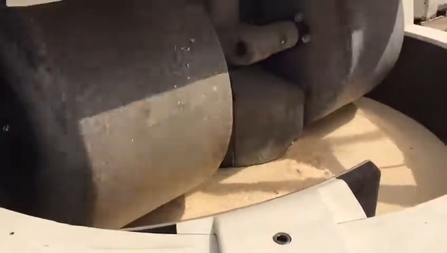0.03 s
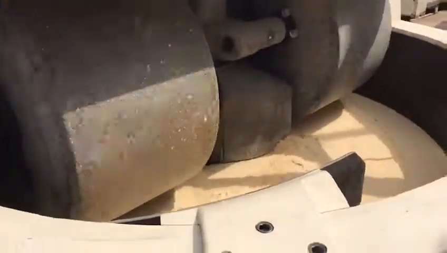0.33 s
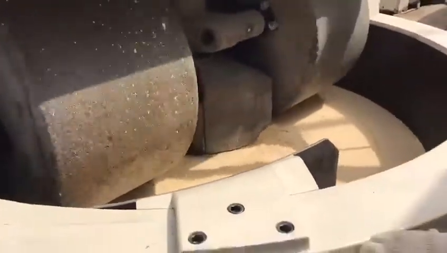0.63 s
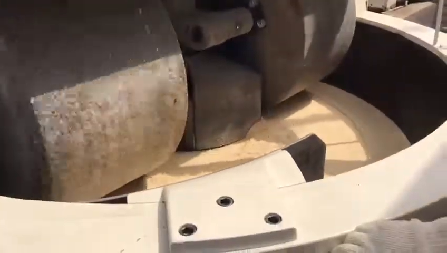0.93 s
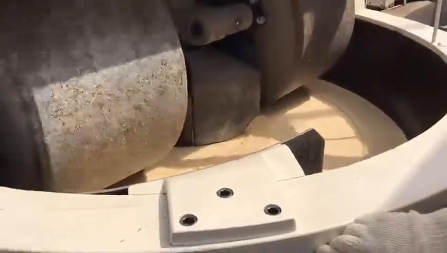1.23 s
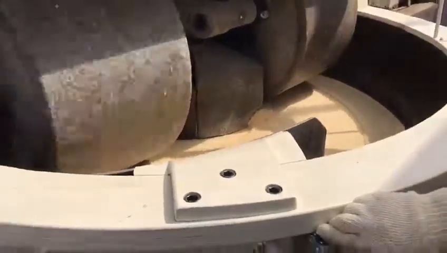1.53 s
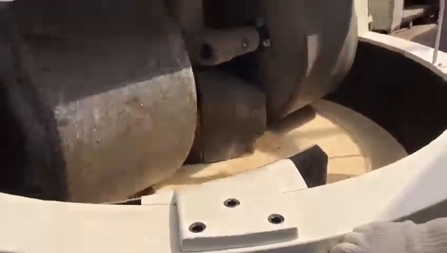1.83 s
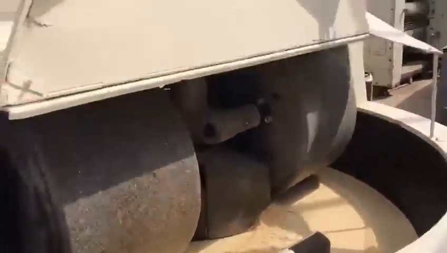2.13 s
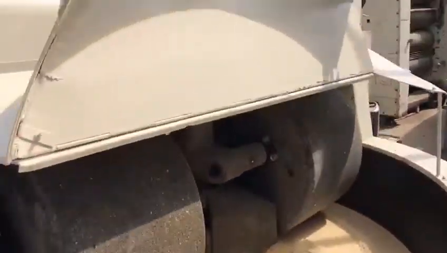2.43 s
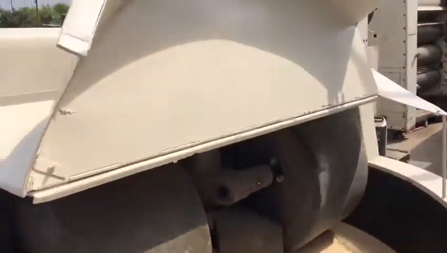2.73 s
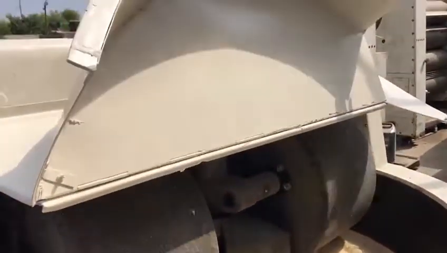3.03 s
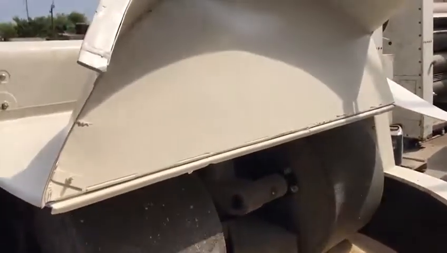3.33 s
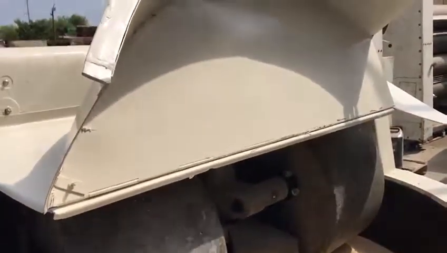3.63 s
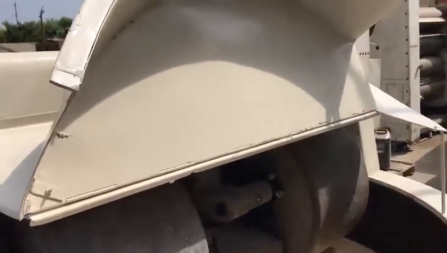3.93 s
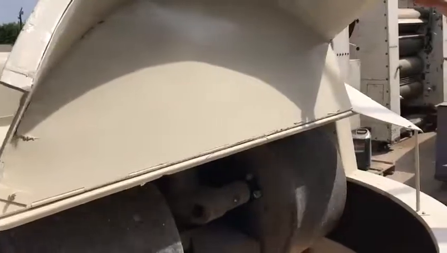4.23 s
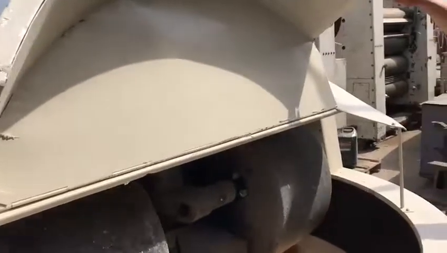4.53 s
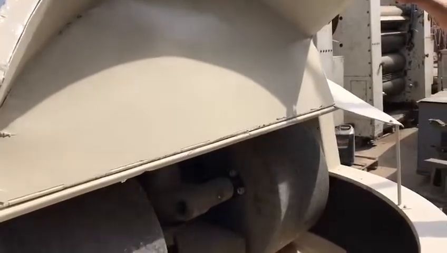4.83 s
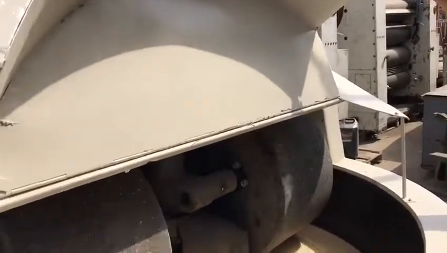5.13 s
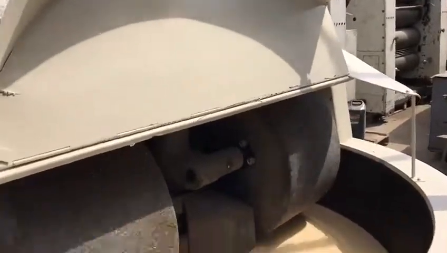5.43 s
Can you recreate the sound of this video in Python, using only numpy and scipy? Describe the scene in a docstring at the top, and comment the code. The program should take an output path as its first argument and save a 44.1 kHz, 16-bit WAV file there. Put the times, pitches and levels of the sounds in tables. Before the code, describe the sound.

Heavy steel rollers grind material in a running mill: a throbbing low rumble with surges of crunching, hissing grit and occasional knocks.

```python
"""Roller mill in open air

A large mill is heard from the rim of its open pan. Forced vibration makes the frame throb and the
drive drone, swelling each time a roller takes load. Impacts of the rollers on the bed rumble and
knock through the resonances of the steel housing and the hood. Each pass, and each lump of feed
caught under a roller, crunches and bursts by brittle fracture into hissing grit, with a few cracks."""
import sys
import numpy as np
from scipy import signal
from scipy.fft import rfft, irfft
from scipy.io import wavfile

SR = 44100
rng = np.random.default_rng(int(sys.argv[2]) if len(sys.argv) > 2 else 0)


def master_out(mix):
    """Clip the mix to full scale and print it as 16-bit PCM to the path in sys.argv[1]."""
    frames = np.transpose(np.atleast_2d(mix))
    ceiling = np.clip(frames, -1, 1)
    pcm = np.round(ceiling * 32767).astype(np.int16)
    wavfile.write(sys.argv[1], SR, pcm)


N = 246959
SHAFT_HZ = 10.422


# A roller rides onto the bed about every 3/4 s: peak_load_s, half_width_s, boom_db, grit_db
ROLLER_PASSES = [(0.02, 0.15, -14, -37.5), (0.71, 0.16, -15, -60), (1.48, 0.18, -10, -34.5),
                 (2.19, 0.17, -15, -56.5), (3.03, 0.2, -13, -41), (3.73, 0.2, -14, -43),
                 (4.595, 0.12, -10.5, -35.5), (5.31, 0.22, -13.5, -38)]
# Weaker shaft harmonics; multiples of five are the gear mesh: order, level_db
SHAFT_HARMONICS = [(5, -42), (7, -37.5), (9, -36), (10, -29), (14, -31), (17, -34), (20, -33.5), (25, -33),
                   (45, -41.5)]

def drive(boom_order=15, boom_gain_db=-1.0, idle_db=-23.5):
    """Resonance: one shaft harmonic booms in the pan under load. Returns drone and pan vibration."""
    phase = 2 * np.pi * SHAFT_HZ * np.arange(N) / SR
    passes = power_sum(undb(db) * swell(s, width) for s, width, db, _ in ROLLER_PASSES)
    load = power_sum([undb(idle_db), passes])
    pan = vibration(boom_order * phase, flutter_db=1.45, wobble_rad=0.89)
    harmonics = sum(undb(db) * vibration(order * phase, flutter_db=2.5, wobble_rad=0.43)
                    for order, db in SHAFT_HARMONICS)
    return undb(boom_gain_db) * load * pan + harmonics, pan


# Envelope of the frame's vibration: time_s, level_db
FRAME_ENVELOPE = [(0.0, -40), (0.09, -26), (0.28, -29), (0.89, -17.5), (1.4, -26), (2.21, -28.5),
                  (2.63, -20), (2.93, -28), (3.02, -22), (3.77, -27), (3.84, -33), (4.52, -19.5),
                  (4.83, -39), (5.01, -20.5), (5.49, -27), (5.6, -25)]

def frame(order=6, gain_db=-0.5):
    """Forced vibration: the heavy frame throbs at a low harmonic of the shaft."""
    phase = 2 * np.pi * order * SHAFT_HZ * np.arange(N) / SR
    return undb(curve(FRAME_ENVELOPE) + gain_db) * vibration(phase, flutter_db=2.2, wobble_rad=0.45)


# Envelope of the rolling: time_s, level_db
ROLLING_ENVELOPE = [(0, -20.5), (.28, -23), (.68, -20), (.9, -20.5), (1.03, -21.5), (1.1, -21),
                    (1.22, -18.5), (1.4, -20.5), (1.52, -19), (1.78, -22.5), (2.1, -21), (2.3, -20),
                    (2.4, -22), (3.25, -21), (3.42, -23.5), (3.64, -20.5), (3.92, -24), (4.13, -21.5),
                    (4.38, -22), (4.55, -20.5), (4.85, -24), (5.0, -20), (5.12, -21.5), (5.3, -20.5),
                    (5.47, -22), (5.6, -18)]
# Broad spectrum of the rolling: frequency_hz, gain_db
RUMBLE_SPECTRUM = [(22, -44), (42, -21.5), (72, -2), (86, -5.5), (130, 1.5), (230, -5), (340, -3.5),
                   (385, -10.5), (440, -3), (600, -6), (850, -10), (1200, -13), (1650, -15), (2300, -24),
                   (5000, -47.5), (10000, -68)]
# Modes of the steel housing: pitch_hz, bandwidth_hz, level_db
HOUSING_MODES = [(125.2, 5.9, -12.5), (147.4, 8.2, -3), (182.2, 9.6, -2.5), (234.6, 7.8, -4.5),
                 (286.9, 18, -4), (312, 9.9, -0.5), (347.7, 4.4, -3.5), (393.5, 4.7, -7)]
# Modes of the solid rollers: pitch_hz, bandwidth_hz, level_db
STEEL_MODES = [(698.5, 8, -0.5), (1052, 12, 5.5), (1114, 5, -20.5), (1260, 12, -4.5), (1456, 17, 6),
               (1630, 25, 2.5), (1820, 61, -1), (1905, 18, -3)]

def rollers(crunch, housing_db=-5.0, steel_db=-35.5):
    """Random excitation: dense bumps over the packed bed rumble and keep housing and rollers ringing."""
    rumble = unit(colour(impacts(per_s=3500, spread_db=0.5), RUMBLE_SPECTRUM))
    housing = undb(housing_db) * unit(ring(impacts(per_s=1800, spread_db=-1.5), HOUSING_MODES))
    steel = undb(steel_db) * unit(ring(impacts(per_s=200, spread_db=3.0), STEEL_MODES))
    bite = unit(crunch ** 0.65)  # the ringing grows when the bed crunches
    return undb(curve(ROLLING_ENVELOPE)) * (rumble + housing) + bite * steel


# A roller bumps over the bed and knocks the housing: start_s, centre_hz, level_db
ROLLER_KNOCKS = [(0.145, 273, -19), (0.56, 700, -24), (0.665, 463, -25), (0.93, 730, -27),
                 (1.01, 316, -21.5), (1.027, 233, -19.5), (1.18, 305, -17.5), (1.265, 230, -20.5),
                 (1.465, 325, -20.5), (1.505, 466, -20), (2.288, 278, -21), (3.216, 482, -20.5),
                 (3.604, 504, -19), (4.015, 555, -26), (3.69, 327, -25.5), (4.115, 300, -17.5),
                 (4.12, 476, -23), (4.275, 520, -20.5), (4.46, 388, -20.5), (4.646, 304, -16.5),
                 (4.975, 280, -19.5), (5.0, 490, -23.5)]

def knocks(rise_s=0.0082, decay_s=0.045, spread_octaves=0.24):
    """Damped free vibration: a knock excites the modes near its pitch, and the bed soon damps them."""
    size = 8192
    t = np.arange(size) / SR
    hz, width, _ = np.transpose(HOUSING_MODES + HOOD_MODES + STEEL_MODES)[:, :, None]
    envelope = np.minimum(t / rise_s, 1) * np.exp(-t / decay_s)
    out = np.zeros(N)
    for s, centre_hz, db in ROLLER_KNOCKS:
        share = 1 / (1 + (np.log2(hz / centre_hz) / spread_octaves) ** 4)
        cycles = hz * t + rng.random(hz.shape)
        modes = share * np.exp(-np.pi * width * t + 2j * np.pi * cycles)
        knock = envelope * modes.sum(axis=0)
        start = int(s * SR)
        out[start:start + size] += undb(db) * 2 * knock.imag / np.abs(knock).max()
    return out


# Lumps of feed caught under a roller: start_s, length_s, rise_s, grit_db, crunch_db
FEED_LUMPS = [(0.52, 0.26, 0.02, -38.5, -34), (0.87, 0.062, 0.034, -32, -30.5),
              (0.951, 0.1, 0.031, -38.5, -33.5), (1.074, 0.084, 0.021, -35, -30),
              (1.156, 0.3, 0.067, -37.5, -33.5), (1.478, 0.057, 0.039, -29, -28.5),
              (1.625, 0.18, 0.11, -37.5, -34.5), (1.886, 0.052, 0.018, -42, -40),
              (2.026, 0.13, 0.036, -43.5, -38), (2.252, 0.102, 0.061, -34, -31.5),
              (2.46, 0.065, 0.022, -45, -40.5), (2.838, 0.19, 0.03, -40, -41.5),
              (3.042, 0.031, 0.018, -30, -31.5), (3.13, 0.054, 0.034, -33.5, -34),
              (3.25, 0.24, 0.056, -48, -40), (3.8, 0.055, 0.026, -39, -42), (4.026, 0.095, 0.023, -40, -52),
              (4.166, 0.059, 0.038, -38, -36), (4.44, 0.052, 0.026, -39, -35.5),
              (4.646, .2, 0.033, -47, -36), (4.917, 0.1, 0.059, -32, -31), (5.09, 0.15, 0.025, -37, -35),
              (5.438, 0.13, 0.08, -48, -38.5)]

def grinding(idle_grit_db=-45, idle_crunch_db=-39.5, pass_crunch_db=0.5, patchy_db=1.0):
    """Incoherent addition: a thin steady layer, passes and lumps sum to grit and crunch envelopes."""
    passes = power_sum(undb(db) * swell(s, width) for s, width, _, db in ROLLER_PASSES)
    lump_grit = power_sum(undb(db) * lump(s, length, rise) for s, length, rise, db, _ in FEED_LUMPS)
    lump_crunch = power_sum(undb(db) * lump(s, length, rise) for s, length, rise, _, db in FEED_LUMPS)
    feed = power_sum([undb(idle_grit_db), passes, lump_grit])
    crunch = power_sum([undb(idle_crunch_db), undb(pass_crunch_db) * passes, lump_crunch])
    patchiness = undb(patchy_db * wander(26))
    return feed * patchiness, crunch * patchiness


# Spectrum of the crunching bed: frequency_hz, gain_db
BED_SPECTRUM = [(300, 1.5), (1000, 4), (1700, 5), (2400, 6.5), (3200, 5), (4000, -1), (5000, -6.5),
                (10000, -25)]

def bed(crunch, gain_db=2):
    """Fracture under compression: dense, muffled breaks in the packed layer merge into a crunch."""
    return crunch * undb(gain_db) * unit(colour(impacts(per_s=6500, spread_db=-1.0), BED_SPECTRUM))


# Spectrum of bursting grit: frequency_hz, gain_db
GRIT_SPECTRUM = [(1000, -5), (3100, 1.5), (4200, 1), (4950, -0.5), (5900, 4.5), (7700, 4.5), (8400, 11.5),
                 (8900, 8), (9300, 7), (10100, 1.5), (10600, -39.5)]
# Spectrum of the fine powder: frequency_hz, gain_db
POWDER_SPECTRUM = [(1000, -8), (3100, -7), (4900, 2), (6500, 2), (8500, 0.5), (10600, -36)]

def grit(feed, powder_db=-6.5, shatter_s=0.0022, collapse_s=0.02, trickle=1.0):
    """Cascading fracture: clumps give way, and each of their grains bursts into a spray of splinters."""
    collapses = np.abs(impacts(per_s=48, spread_db=5.0))
    clumps = trickle + unit(decay(collapses, collapse_s))
    burst_energy = impacts(per_s=1100 * clumps, spread_db=3.0) ** 2
    spray = np.sqrt(clumps * decay(burst_energy, shatter_s))
    splinters = unit(colour(spray * impacts(per_s=19000, spread_db=2.7), GRIT_SPECTRUM))
    # duller powder hisses out of each clump between the bursts
    powder = unit(colour(np.sqrt(clumps) * rng.standard_normal(N), POWDER_SPECTRUM))
    return feed * (splinters + undb(powder_db) * powder)


# Coarse grains splitting: start_s, level_db
GRAIN_CRACKS = [(0.1301, -22), (0.7053, -11), (1.0904, -30), (1.113, -20), (1.5085, -25), (1.521, -23),
                (1.6521, -35), (2.3156, -17), (2.337, -22), (2.9524, -20), (3.0736, -15), (4.4482, -13),
                (4.555, -14), (4.6193, -23), (5.011, -21), (5.2021, -21)]

def cracks(gain_db=-4, crumble_s=0.00033):
    """Brittle fracture: a coarse grain splits within milliseconds, radiating a broadband pulse."""
    size = 1024
    envelope = np.exp(-np.arange(size) / SR / crumble_s)
    out = np.zeros(N)
    for s, db in GRAIN_CRACKS:
        start = int(s * SR)
        out[start:start + size] += undb(db + gain_db) * envelope * rng.standard_normal(size)
    return colour(out, GRIT_SPECTRUM)


# A roller scraping steel: peak_s, half_width_s, level_db
ROLLER_SCRAPES = [(0.33, 0.04, -39), (0.58, 0.027, -32), (1.08, 0.025, -32.5), (1.53, 0.046, -35),
                  (2.16, 0.12, -32), (2.95, .1, -31), (4.23, 0.027, -30), (4.29, 0.016, -26),
                  (5.58, 0.036, -40)]

def scrapes():
    """Frictional excitation: where the bed runs thin, a roller scrapes and its modes ring out."""
    force = power_sum(undb(db) * swell(s, width) for s, width, db in ROLLER_SCRAPES)
    return force * unit(ring(impacts(per_s=1200, spread_db=2.0), STEEL_MODES))


# Modes of the air under the hood: pitch_hz, bandwidth_hz, level_db
HOOD_MODES = [(286.4, 8.2, 0), (359, 9, -5), (482, 21, -6), (507.5, 17.5, 0), (548.4, 25, -6),
              (586.5, 17, -8)]
# Envelope of the hollow growl: time_s, level_db
GROWL_ENVELOPE = [(0, -25), (.4, -28), (1.0, -30), (1.5, -39), (1.85, -32.5), (2.3, -23), (2.65, -26.5),
                  (3.1, -21), (3.45, -24.5), (3.8, -23), (4.15, -21), (4.75, -30), (5.05, -25.5),
                  (5.6, -27.5)]

def hood(gain_db=-2.5):
    """Cavity resonance: the air under the half-open hood gives the rolling a hollow growl."""
    growl = unit(ring(impacts(per_s=2500, spread_db=1.5), HOOD_MODES))
    return undb(curve(GROWL_ENVELOPE) + gain_db) * growl


def vibration(phase, flutter_db, wobble_rad):
    """Amplitude and phase modulation: a sinusoid of rms 1, jostled by the uneven bed."""
    amplitude = undb(flutter_db * wander(29.0))
    return unit(amplitude * np.sin(phase + 2 * np.pi * rng.random() + wobble_rad * wander(2.4)))


def impacts(per_s, spread_db):
    """Poisson process: random impulses; a few stand out if spread_db > 0, or are weaker if below."""
    hit = rng.random(N) < per_s / SR
    size = undb(spread_db * np.minimum(rng.exponential(size=N), 5))
    return hit * size * rng.choice([-1, 1], N)


def ring(x, modes):
    """Modal superposition: x drives parallel resonators, each with its power set by its level."""
    f = np.maximum(np.arange(N // 2 + 1) * SR / N, 1)
    response = sum(undb(db) / np.sqrt(width) / (1 + 1j * (f * f - hz * hz) / (f * width))
                   for hz, width, db in modes)
    return irfft(rfft(x) * response, N)


def colour(x, spectrum):
    """Minimum-phase filtering: a causal response through (frequency_hz, gain_db) points."""
    hz, db = np.transpose(spectrum)
    f = np.maximum(np.arange(N // 2 + 1) * SR / N, 1)
    magnitude = undb(np.interp(np.log(f), np.log(hz), db))
    cepstrum = irfft(np.log(magnitude), N)
    cepstrum[1:N // 2] *= 2
    cepstrum[N // 2:] = 0
    return irfft(rfft(x) * np.exp(rfft(cepstrum)), N)


def swell(peak_s, half_width_s):
    """Bell-shaped envelope: a smooth rise to 1 and a smooth fall."""
    return np.exp(-.5 * np.abs((np.arange(N) / SR - peak_s) / half_width_s) ** 2.2)


def lump(start_s, length_s, rise_s, release_s=0.026):
    """Attack, sustain and release: a lump is drawn in, ground for a while, and crumbles away."""
    t = np.arange(N) / SR - start_s
    return np.clip(t / rise_s, 0, 1) * np.exp(-np.maximum(t - length_s, 0) / release_s)


def decay(x, decay_s):
    """Exponential relaxation: each impulse jumps up and dies away."""
    return signal.lfilter([1], [1, -np.exp(-1 / (decay_s * SR))], x)


def wander(cutoff_hz):
    """Low-pass noise: a smooth random drift of rms 1."""
    f = np.arange(N // 2 + 1) * SR / N
    return unit(irfft(rfft(rng.standard_normal(N)) / (1 + (f / cutoff_hz) ** 2), N))


def power_sum(gains):
    """Incoherent addition: the powers of unrelated vibrations add."""
    return np.sqrt(sum(gain ** 2 for gain in gains))


def curve(rows):
    """Linear interpolation of (time_s, value) rows, one value a sample."""
    return np.interp(np.arange(N) / SR, *np.transpose(rows))


def undb(db):
    """Decibels to amplitude ratio."""
    return 10 ** (np.asarray(db) / 20)


def unit(x):
    """Normalisation to rms 1."""
    return x / np.sqrt(np.mean(x ** 2))


def scene():
    """Superposition: all the mill's sources add in one channel, close by in open air."""
    feed, crunch = grinding()
    drone, pan = drive()
    shaken_feed = feed * (1 + 0.075 * pan)  # the vibrating pan modulates the grit
    crushing = bed(crunch) + grit(shaken_feed) + cracks()
    return (drone + frame() + rollers(crunch) + scrapes() + hood() + crushing + knocks())[None]


def record(dry, ceiling=0.92, cutoff_hz=10400):
    """Soft saturation rounds the highest peaks, and a steep low-pass filter cuts the top treble."""
    rounded = dry / (1 + (dry / ceiling) ** 8) ** (1 / 8)
    return signal.sosfilt(signal.ellip(10, .2, 90, cutoff_hz, fs=SR, output="sos"), rounded)


dry = scene()
out = record(dry)
master_out(out)
```